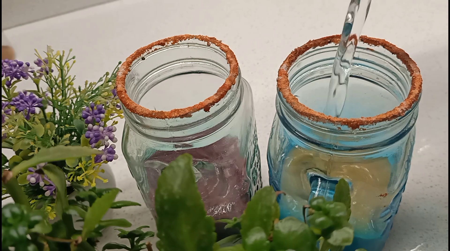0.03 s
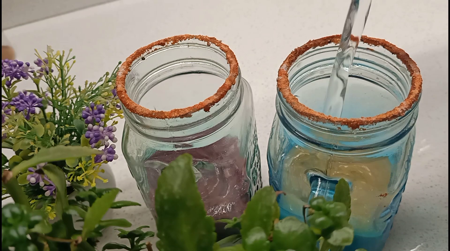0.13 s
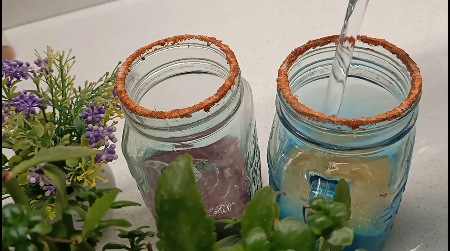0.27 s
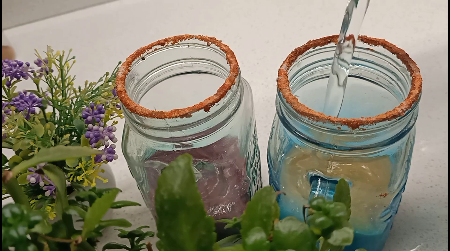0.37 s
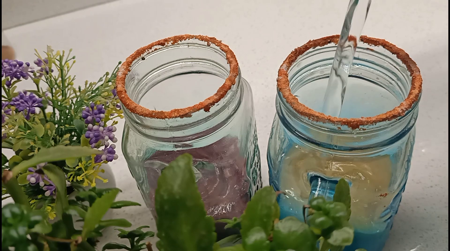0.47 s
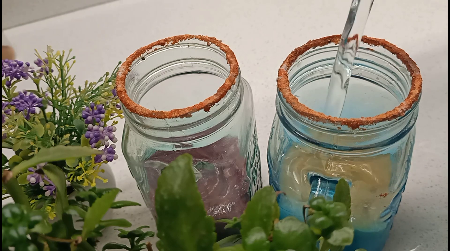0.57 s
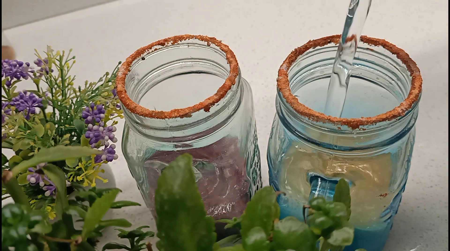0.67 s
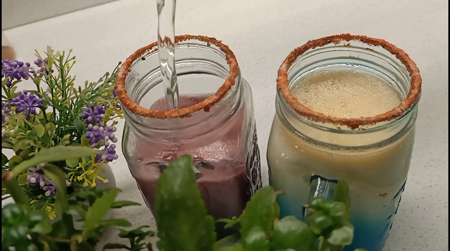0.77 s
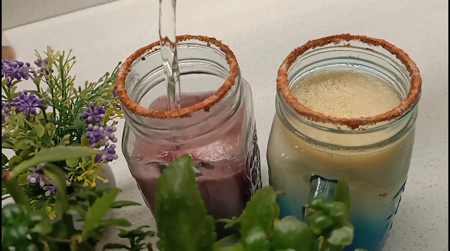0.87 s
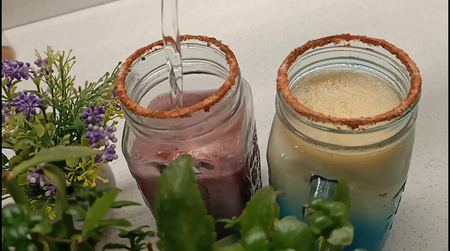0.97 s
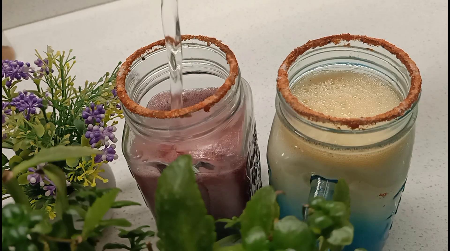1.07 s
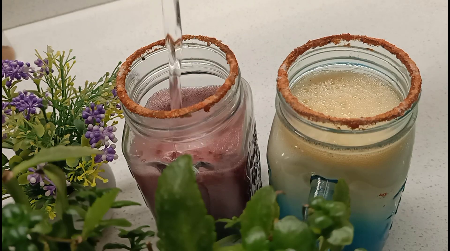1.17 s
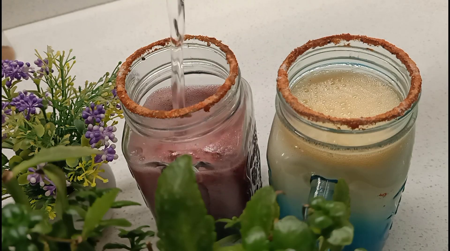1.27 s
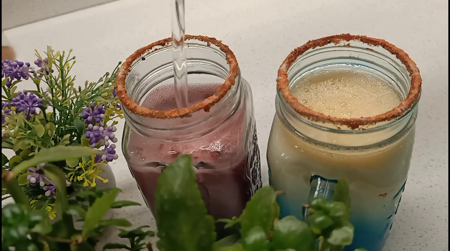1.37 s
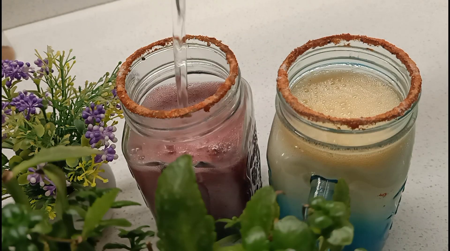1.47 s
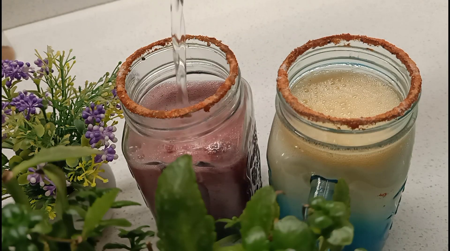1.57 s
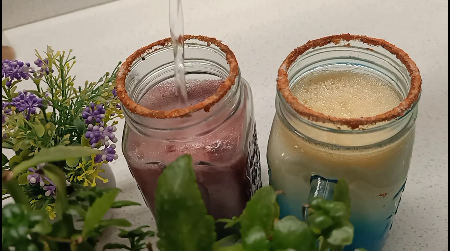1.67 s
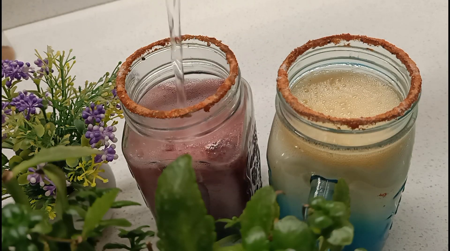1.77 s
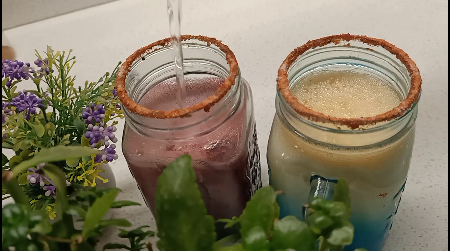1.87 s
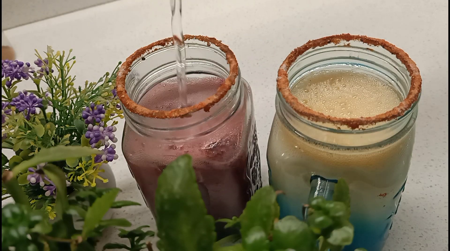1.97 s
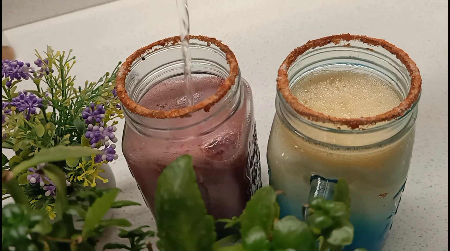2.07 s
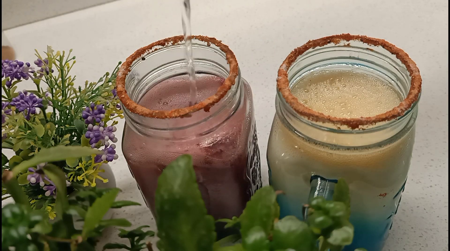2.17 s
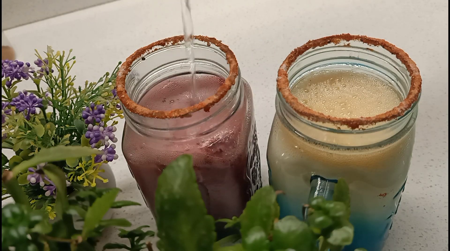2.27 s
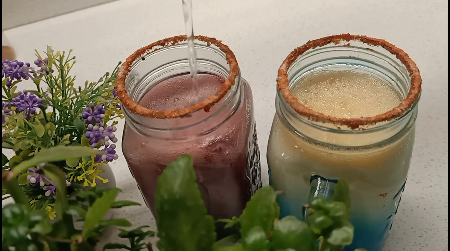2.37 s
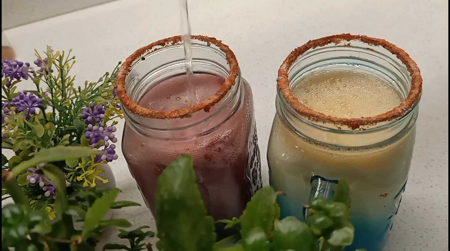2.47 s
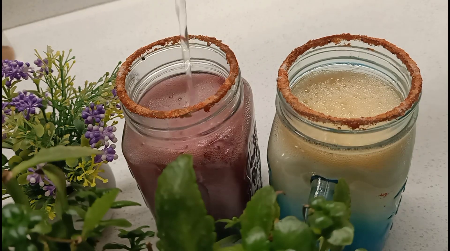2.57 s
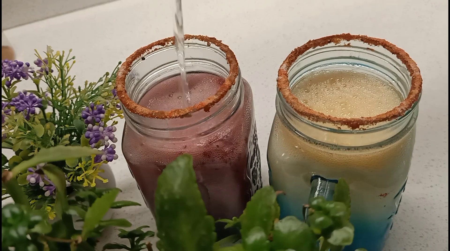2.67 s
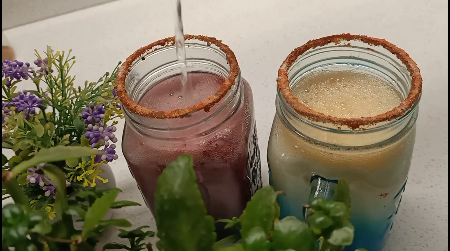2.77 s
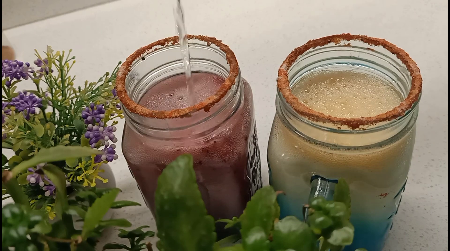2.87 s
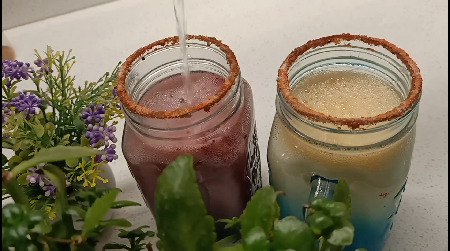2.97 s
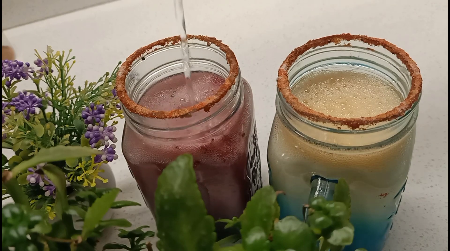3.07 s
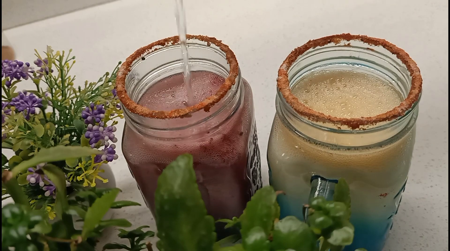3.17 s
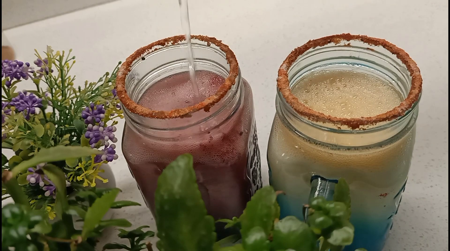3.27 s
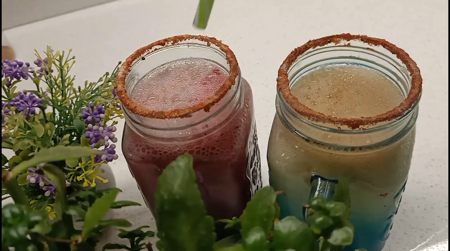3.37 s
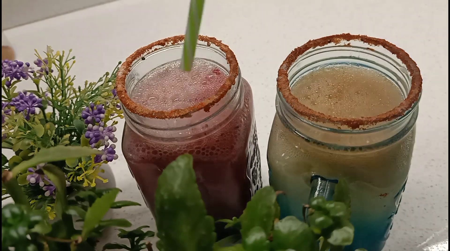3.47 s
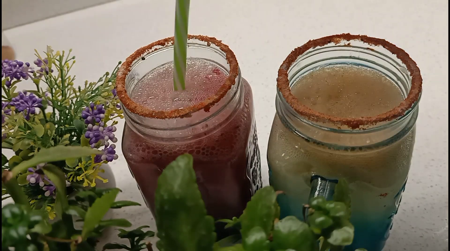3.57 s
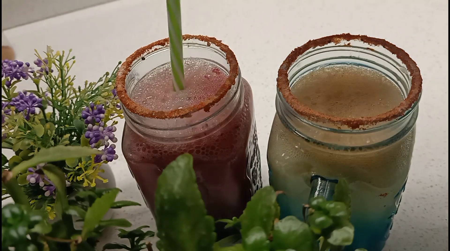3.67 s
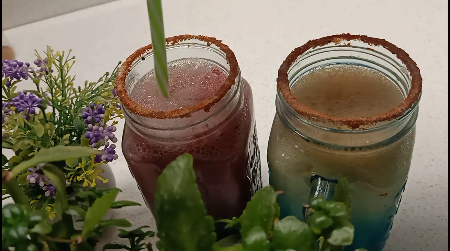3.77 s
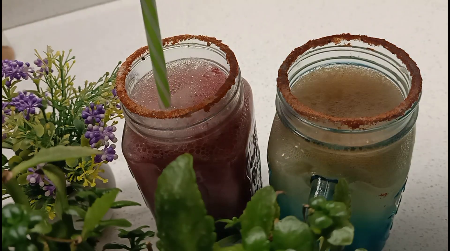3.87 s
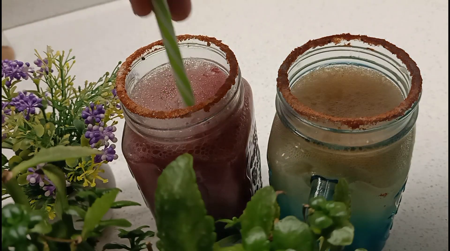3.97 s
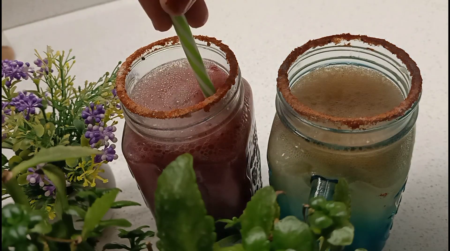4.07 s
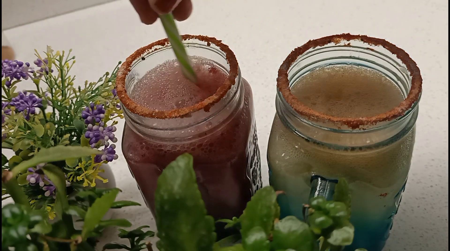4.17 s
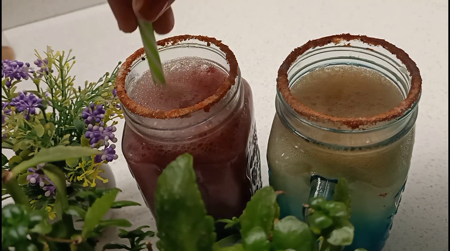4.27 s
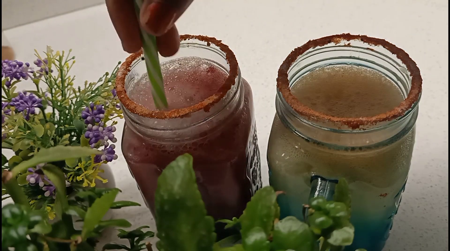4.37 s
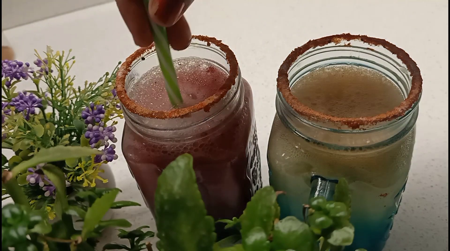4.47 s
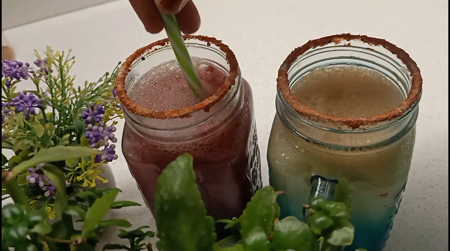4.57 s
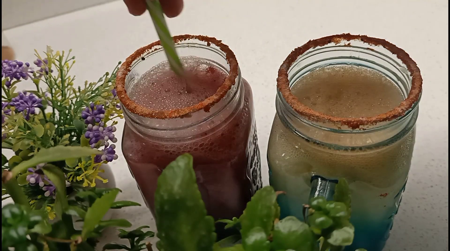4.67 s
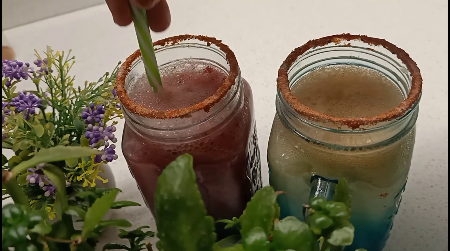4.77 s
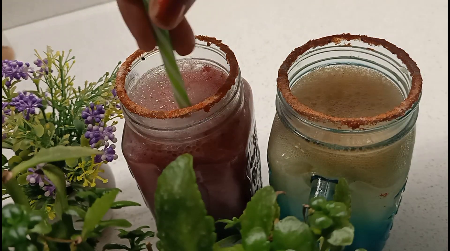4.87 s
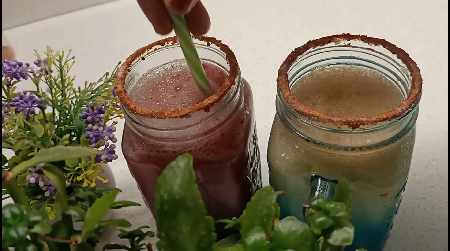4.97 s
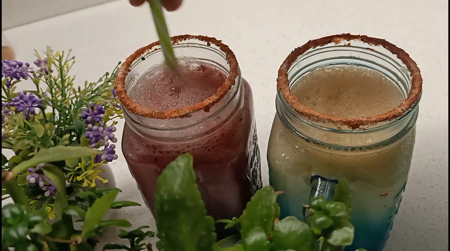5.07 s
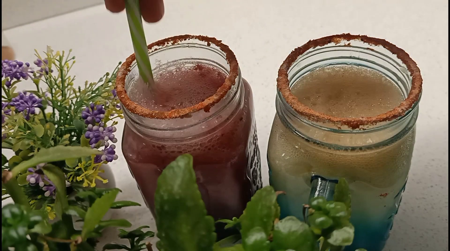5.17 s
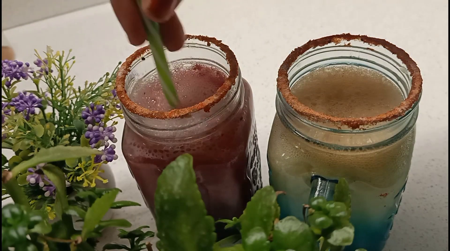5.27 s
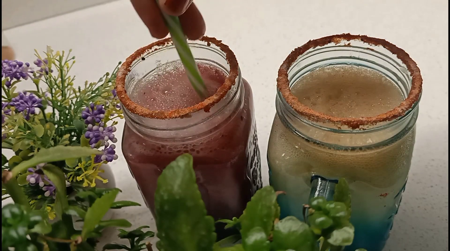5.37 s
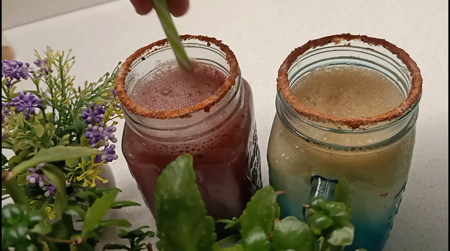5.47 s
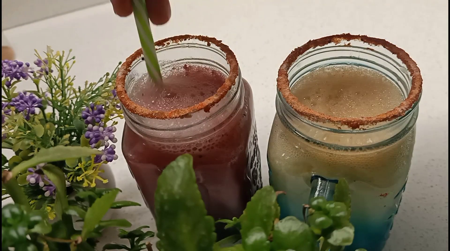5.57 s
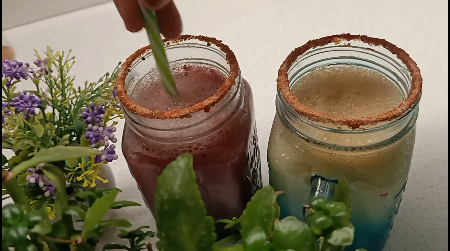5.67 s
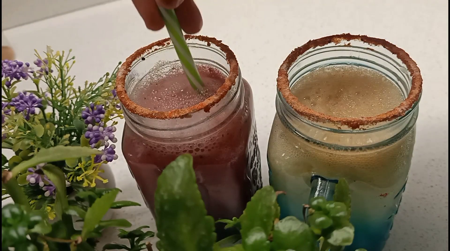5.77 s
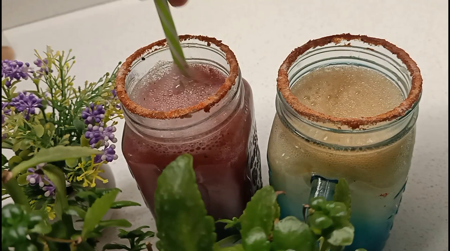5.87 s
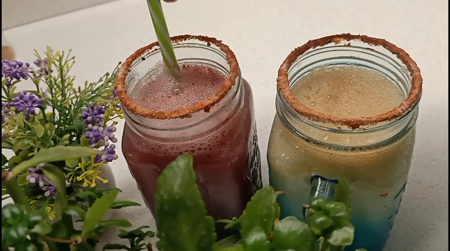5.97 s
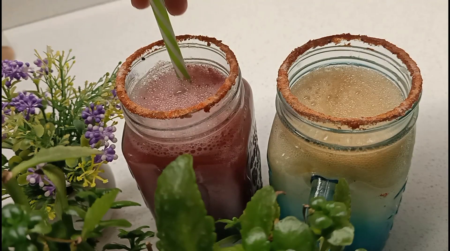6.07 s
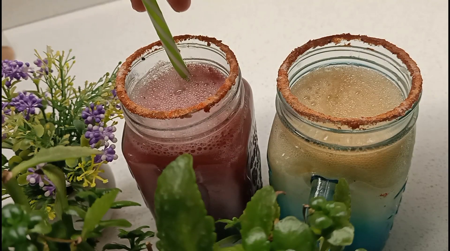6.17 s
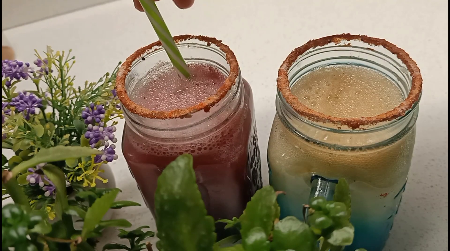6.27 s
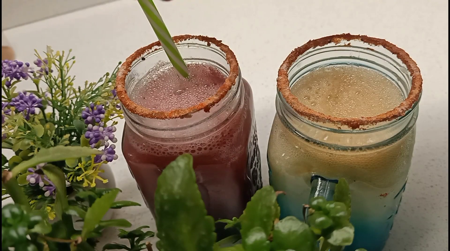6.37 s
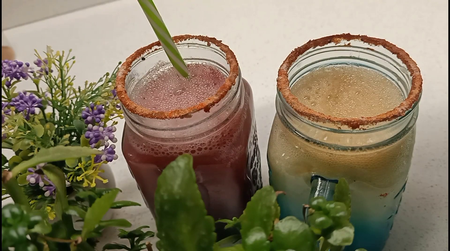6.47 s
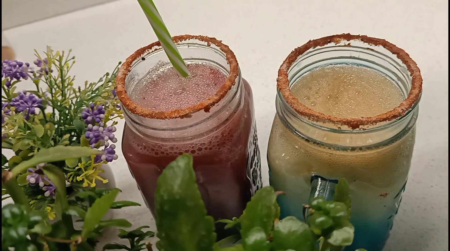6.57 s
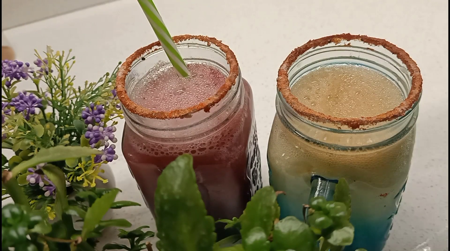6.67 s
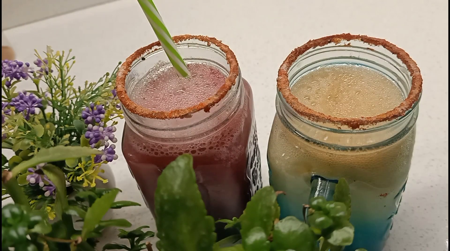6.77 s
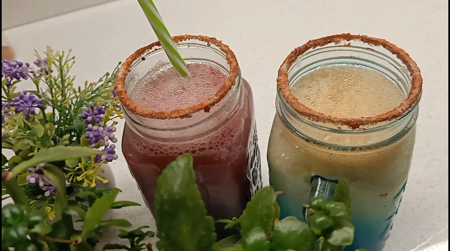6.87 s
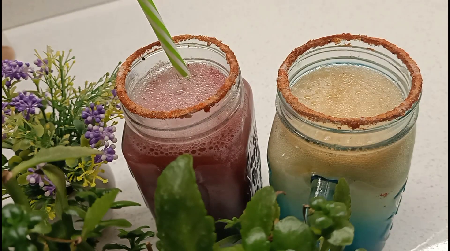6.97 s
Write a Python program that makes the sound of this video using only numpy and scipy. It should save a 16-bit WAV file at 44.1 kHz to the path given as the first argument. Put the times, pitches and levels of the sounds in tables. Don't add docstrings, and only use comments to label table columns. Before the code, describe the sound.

In a small hard-surfaced kitchen, close stereo microphones catch a low steady fridge hum and soft room air. From 0 to 0.9 s soda streams over ice in a glass jar: rapid hollow knocks, glassy clacks and gurgles, with a loud singing swell of the jar's air around 0.6 s. An abrupt cut at 0.9 s brings another jar: deeper wet clunks, strongest from 1.25 to 1.6 s, then round bubble plinks and lighter ice taps over trickling liquid and fine foam hiss, thinning towards 3.4 s. At 3.5 s it cuts to stirring: a tiny metallic bracelet tick, gulps and a thud around 3.6-3.8 s, sparse clicks, then a busier cluster near 4.4 s. Quick clinks, loud plops and jar thuds crowd 5.05-5.8 s. Afterwards a few taps and faint metal ticks fade into fizz and hum until 7 s.

```python
import sys
import numpy as np
from scipy import signal
from scipy.fft import rfft, irfft, next_fast_len
from scipy.io import wavfile
from scipy.ndimage import uniform_filter1d

SR = 44100
rng = np.random.default_rng(int(sys.argv[2]) if len(sys.argv) > 2 else 0)


def to_wav(sig):
    pcm = np.clip(np.atleast_2d(sig), -1, 1) * 32767
    pcm = np.round(pcm).astype(np.int16)
    wavfile.write(sys.argv[1], SR, pcm.T)


def nominal_scale(level):
    x = np.asarray(level, float) / 20
    return 10 ** x


N = 309582

SHOT_BOUNDS = [
    0,
    .884,
    3.465,
    7.03,
]

# (frequency [Hz], density [dB per Hz])
KITCHEN_AIR = [(15, -60), (25, -38), (53, -29), (121, -2), (161, -0.5), (262, -17.5), (415, -22),
               (503, -10), (568, -16.5), (4900, -30.5), (5950, -40.5), (8150, -44.5), (10600, -71),
               (17900, -120)]
# (frequency [Hz], left-right likeness [-1 to 1, clipped])
COHERENCE = [(60, 0.43), (200, 0.071), (680, -2), (2290, 1), (7700, 1)]
# (frequency [Hz], level [dB rms])
FRIDGE_HUM = [(117, -59.5), (215, -76.5), (259, -93), (330, -82), (500, -88.5)]
# (frequency [Hz], t60 [s])
ROOM_DECAY = [(250, 0.39), (1000, 0.31), (2300, 0.3), (3400, 0.36), (8000, 0.17)]
# (delay [s], level [dB])
REFLECTIONS = [
    [(.0011, -22), (.0027, -5), (.0046, -6.5)],
    [(.0006, -13), (.0019, -8.5), (.0038, -36.5)],
]
ROOM_DB = [
    -3,
    -2.5,
    -2.5,
]
# (frequency [Hz], gain [dB])
MIC_RESPONSE = [(25, -2), (80, -8.5), (300, 0), (6800, -4), (7500, -12.5), (7900, -17), (12500, -33),
                (15200, -19), (16200, -70)]
RIGHT_DELAY = [
    1,
    7,
    8,
]
PORT_GAIN_DB = [
    [1.2],
    [-1.2],
]
# (frequency [Hz], gain [dB])
RIGHT_TINT = [(150, -0.5), (300, 3.5), (700, -1.5), (2500, 2), (5000, -1), (9000, 3), (13000, 3.5)]

# (time [s], level [dB])
STREAM_LEVEL = [(0.0, -47), (0.306, -56), (0.672, -48), (0.884, -44.5), (0.886, -56), (1.13, -81),
                (1.42, -54), (1.69, -59.5), (2.23, -51), (3.31, -56), (3.43, -53), (3.465, -61)]
# (time [s], level [dB])
STRAW_PULLS = [
    (3.75, -56),
    (4.399, -52),
    (5.23, -53),
    (5.372, -49.5),
    (5.79, -56),
]
SLOSH_LEVEL = [
    -63,
    -50,
    -51,
]
FOAM_LEVEL = [
    -59.5,
    -58.5,
    -62,
]
# (time [s], level [dB], fall [dB/s])
BARE_ICE = [
    (0.304, -41, 203),
    (2.26, -57.5, 77),
]
# (frequency [Hz], density [dB per Hz])
FIZZ_SPECTRUM = [(3000, -20), (4500, -14.5), (6500, -4), (8000, -7), (11000, -3), (13000, -2),
                 (15200, -0.5), (16000, -28.5)]
# (frequency [Hz], density [dB per Hz])
GURGLE_SPECTRUM = [(150, -50), (300, -9), (600, 4), (1000, 0.5), (1400, -1), (1900, 2), (3000, -5.5),
                   (4200, -15.5), (6000, -60), (8000, -44.5)]
# (time [s], peak level [dB], frequency [Hz])
LONE_PLOPS = [(0.2103, -53, 2700), (0.244, -41, 2700), (0.266, -29.5, 1770), (0.2903, -27, 3870),
              (0.5022, -34, 1390), (0.672, -24.5, 1360), (1.866, -51, 1000), (2.013, -38, 1280),
              (2.024, -34, 1330), (2.145, -39, 1400), (2.322, -34, 1390), (2.478, -38, 1380),
              (2.652, -31, 1430), (2.728, -55, 1390), (2.767, -42, 1430), (2.786, -40, 1540),
              (2.802, -48, 1380), (2.826, -38, 1470), (2.862, -32.5, 1440), (2.939, -46, 1380),
              (2.985, -36.5, 1450), (3.07, -47, 1340), (3.104, -39, 1410), (3.256, -39, 1440),
              (3.288, -38, 1430), (3.314, -31, 1510), (3.373, -36.5, 1390), (3.76, -29.5, 810),
              (4.2915, -40, 2260), (4.868, -45, 1370), (5.219, -28, 1300)]
# (time [s], peak level [dB], frequency [Hz])
LONE_PLINKS = [(1.299, -33, 1270), (1.3973, -26.5, 1250), (1.4336, -22, 1220), (1.482, -25, 1290),
               (1.5465, -35, 1290), (1.5803, -29, 1240), (1.6128, -37, 1300), (1.6387, -33, 1280),
               (1.7719, -36, 1300), (1.987, -38, 1300), (2.0827, -30, 1370), (2.1105, -23.5, 1340),
               (2.192, -34, 1340), (2.2724, -34, 1400), (2.3208, -37, 1340), (2.3787, -35, 1390),
               (2.4517, -29, 1410), (2.51, -28, 1370), (2.5213, -37, 1310), (2.5426, -35, 1350),
               (2.6711, -30, 1450), (2.895, -36, 1380), (3.3053, -38, 1480), (4.62, -37, 1300),
               (4.7416, -57, 1390), (5.1414, -41, 1420), (5.1654, -37, 1270), (5.188, -34, 1270),
               (5.2195, -15, 1420), (5.252, -46, 1450), (5.3698, -22, 1140), (5.5282, -26.5, 1430),
               (5.5839, -31, 1260), (5.7418, -43, 1260), (5.7578, -38, 1340), (5.7745, -36, 1140),
               (5.797, -33, 1220), (5.8178, -32, 1340), (5.8469, -43, 1250), (6.0346, -48, 1390)]

# (time [s], peak level [dB])
LINK_TOUCHES = [
    (3.5473, -43),
    (6.1953, -55.5),
    (6.463, -56),
    (6.8917, -49),
    (6.994, -49.5),
]
# (frequency [Hz], level [dB], t60 [s])
LINK_MODES = [(4940, -7.5, 0.08), (6425, 0, 0.1), (7800, 0, .04), (10500, 1.5, 0.048), (10500, 4.5, 0.0403),
              (11200, 5.5, .04), (14750, 1, 0.03), (15050, 7, 0.097), (15300, 0.5, 0.019), (15550, 8, .02)]
# (time [s], peak level [dB], frequency [Hz], cycles to the peak [1])
JAR_THUDS = [(0.01, -50, 106.6, 0.64), (0.68, -51, 60, 2.4), (1.052, -43.5, 164.7, 1.4),
             (1.66, -43.5, 114, 2.3), (1.799, -43, 118, 2.9), (2.14, -54, 300, 1.5), (2.341, -41, 99, 2.1),
             (3.19, -33, 133, 0.68), (3.627, -39, 194, 1.15), (3.759, -35, 243, 0.54),
             (5.362, -29, 241, 0.56), (5.373, -31.5, 312, 1.3), (5.72, -38.5, 223, 1.4),
             (5.761, -32, 215, 0.9), (5.787, -27.5, 290, 0.62), (5.81, -46, 197, 1.3)]
# (time [s], peak level [dB], frequency [Hz], cycles to the peak [1])
AIR_SWELLS = [
    (0.0, -28, 658, 17),
    (0.083, -35.5, 694, 5),
    (0.165, -35, 691, 8.2),
    (0.522, -30, 690, 3.5),
    (0.575, -5.5, 730, 2.15),
    (0.638, -11, 702, 5.3),
    (0.683, -17.5, 737, 8.9),
    (0.706, -31.5, 2720, 48),
    (0.812, -23.5, 761, 4.8),
    (0.828, -17, 770, 8.7),
]
# (time [s], blip peak level [dB], blip frequency [Hz], hardness [dB])
GULPS = [(1.0583, -25.5, 498, -36), (3.614, -26, 1030, -16), (3.628, -29.5, 900, -13),
         (3.643, -33, 1000, -20), (3.67, -36.5, 870, -19), (3.718, -46, 590, -15), (5.309, -60.5, 746, 26),
         (5.3602, -16, 687, -34), (5.371, -39, 784, -31), (5.743, -39.5, 955, 13),
         (5.7655, -16.5, 678, -26), (5.783, -23, 689, -14), (5.948, -24.5, 996, -8.5),
         (6.4, -43.5, 773, -35.5), (6.412, -43.5, 764, -33), (6.427, -46.5, 970, -39),
         (6.445, -61, 780, -30), (6.462, -64, 780, -30)]
# (frequency [Hz], width [Hz], level [dB])
ICE_POCKETS = [
    (700, 76, -9),
    (1000, 41, -9),
]

# (starting frequency [Hz], rise as the jar fills [Hz/s], width [Hz], level [dB])
JAR_MODES = [
    [(624, 107, 26, -8), (709.4, 40, 5, 1.5), (293.6, -45, 21, 24.5), (2720, 11.5, 88, 7.5),
     (3050, 13.5, 12, -7.5)],
    [(406.6, 0.02, 44.5, 14.5), (1000, 0.052, 194, 4.5), (1390, 0.02, 89, 8)],
    [(290, 0.016, 24.3, 17), (746, 0.016, 110, -3), (1398, 0.011, 45, 7.5), (3300, 0.0073, 190, -0.5)],
]
# (time [s], blip peak level [dB],
# hardness: clack over blip [dB], sharpness: tick over blip [dB])
FIRST_JAR_KNOCKS = [(0.001, -18, -13, -8.5), (0.0691, -30.5, -31.5, -27), (0.0831, -26, -20, -4),
                    (0.1204, -25.5, -14, -4.5), (0.1707, -37, -24, -25), (0.19, -46.5, -7, 19.5),
                    (0.2594, -51, 19.5, 7), (0.2805, -31.5, -5.5, -31), (0.2983, -31.5, 4, 0.5),
                    (0.308, -20.5, -1.5, -10), (0.3633, -13.5, -24.5, -35.5), (0.4134, -17.5, -7.5, -13),
                    (0.4505, -29, -9.5, -3.5), (0.5166, -26.5, 1.5, 1), (0.5324, -29, -13.5, -26),
                    (0.5706, -5.5, -35.5, -4.5), (0.6299, -35, 5, -19), (0.6385, -11, -13, -4),
                    (0.6855, -22, -2, -20), (0.7032, -28, 4.5, 5.5), (0.7493, -17, -17.5, -12),
                    (0.8142, -17.5, -24.5, -72), (0.8252, -20.5, -7.5, -5), (0.8369, -23.5, -28, -12),
                    (0.8703, -35.5, 4, 9)]
DEEP_KNOCKS = [(0.9065, -35.5, -3.5, -18), (1.0189, -25, -32, -31), (1.0575, -17.5, -25.5, -24),
               (1.2033, -17, -10.5, -34), (1.2075, -36.5, 8, -18), (1.261, -25, -6, -15),
               (1.2722, -12, -5.5, 1.5), (1.298, -23.5, -22, -5), (1.3517, -9.5, -20, -28),
               (1.3955, -13.5, -24, -44), (1.4163, -9, -13.5, -14), (1.4548, -8, -21, -26),
               (1.478, -21, 4.5, 3), (1.435, -25, -34, -34), (1.6389, -23, -16, -40),
               (1.7917, -25.5, -3, -26), (1.8825, -29, -21, -17), (2.191, -38, -18, 6),
               (2.4095, -40.5, 14.5, 1), (2.5072, -25, -26, -10), (2.5729, -26, -11.5, -14),
               (2.5967, -28.5, -15, -29), (2.6437, -27.5, -19, -29), (3.1944, -27, -63, -27),
               (3.4522, -35.5, -12, -22)]
SURFACE_KNOCKS = [(1.5002, -16.5, -41, -16), (1.5738, -17.5, -21, -30), (1.5882, -13.5, -25, -17),
                  (1.7285, -23, 2.5, -2.5), (1.7781, -25, -4, -8), (1.8985, -14.5, -10, -44),
                  (1.9544, -26.5, 3, 3), (2.0341, -27, -21, -29), (2.0464, -21, -8.5, -6),
                  (2.0954, -26, -33, -1), (2.1104, -23, -12, -40), (2.1268, -18.5, -20, -30),
                  (2.172, -25, -17, -14), (2.2693, -36, -0.5, -13), (2.3009, -20.5, -48, -27),
                  (2.3427, -20, -17.5, -22), (2.3878, -18.5, -14.5, -18), (2.4241, -19.5, -30, -15),
                  (2.4321, -38.5, 19.5, 17), (2.5499, -23, -9, -10), (2.6672, -22.5, -12.5, -18),
                  (2.8516, -33, -23, -29), (2.9112, -25.5, -20, -37), (3.0278, -28.5, -14, -33),
                  (3.1231, -23.5, -20.5, -34), (3.1672, -35, -26, -30), (3.2217, -25, -15, -11),
                  (3.3033, -36.5, 5, -31), (3.3862, -30, -1.5, -29), (3.4076, -25, -3.5, -1)]
STIR_KNOCKS = [(3.7575, -16, -19, -14), (3.8732, -45.5, 20.5, 28.5), (3.9223, -36, 8, 2),
               (4.027, -38.5, -17, -18), (4.0478, -34, -20, -5), (4.0584, -29, -19, -15),
               (4.1186, -29.5, -9.5, -9), (4.1951, -27.5, -10.5, -6), (4.2222, -27, -12, -10),
               (4.2687, -17, -10, 0.5), (4.3096, -25, -8.5, -21), (4.3509, -25.5, -12, -6),
               (4.3746, -27, -20, -9), (4.4397, -25.5, -3, 6.5), (4.4487, -18.5, -9, -32),
               (4.4585, -30.5, 9.5, 14), (4.4661, -46, -17, 11), (4.4875, -18, -1, -2.5),
               (4.5135, -18, -11, -4), (4.6185, -27.5, -7.5, -27.5), (4.6659, -31, -16, -38),
               (4.7405, -27.5, -3.5, -12), (4.9024, -19, -17, -8), (4.9088, -33, 6, -6),
               (4.9239, -28, -5, -2),
               (5.0278, -29, -37, -30), (5.0624, -10.5, -13, -6.5), (5.106, -25.5, -8.5, -7),
                     (5.142, -52, 4, -22), (5.1651, -20, 1, -1.5), (5.215, -14.5, 0.5, 7),
                     (5.3349, -21, -6.5, 1), (5.39, -20, -5, -15), (5.3969, -22.5, -11, 0),
                     (5.4263, -22, -3.5, 1.5), (5.455, -33.5, 4.5, -15), (5.4763, -28.5, -13.5, -24),
                     (5.4783, -21, 0.5, 0), (5.5283, -25, -3.5, -6), (5.581, -21.5, -32, -20),
                     (5.6648, -30, -4.5, -25), (5.7165, -27.5, -29, -19), (5.7284, -25, -6, 4),
                     (5.7397, -20.5, 4.5, 1), (5.8065, -13, -7.5, -31), (5.8672, -26, -6, 0.5),
                     (6.03, -24.5, -3, -4.5), (6.055, -31.5, -3, -11), (6.07, -42, 10, 14.5),
                     (6.255, -65, 11, -1), (6.3241, -32, -47, -35)]
# (time [s], centre of the clack [Hz])
WALL_SPOTS = [(0.1204, 2780), (0.2594, 2840), (0.2983, 3530), (0.308, 3050), (0.4134, 2550), (0.4505, 2330),
              (0.5166, 3180), (0.6299, 3070), (0.6385, 2920), (0.6855, 3060), (0.7032, 3350),
              (0.8252, 2800), (0.8703, 2740), (1.2033, 2330), (1.261, 2650), (1.2722, 2730), (1.4163, 2600),
              (1.4771, 3370), (1.7285, 3380), (1.7917, 2940), (1.8985, 2800), (1.9544, 3460),
              (2.0464, 3140), (2.4095, 3020), (2.4321, 3540), (2.5499, 2660), (3.3033, 2800),
              (3.3862, 3100), (3.4076, 2480), (3.8732, 3320), (3.9223, 2580), (4.1186, 3100),
              (4.1951, 2500), (4.2687, 2640), (4.3096, 2820), (4.4397, 2620), (4.4569, 3270),
              (4.4866, 3300), (4.5135, 2500), (4.6185, 2640), (4.7378, 2600), (4.9088, 2940),
              (5.0624, 2630), (5.1654, 3180), (5.215, 3200), (5.3347, 2430), (5.3905, 3080), (5.4261, 2340),
              (5.455, 3480), (5.4783, 2600), (5.6644, 2940), (5.7393, 3050), (5.8067, 2940), (6.0297, 2500)]

# (frequency at its first knock [Hz], rise [Hz/s])
FIRST_AIR, DEEP_AIR, SURFACE_AIR, STIRRED_AIR = (672, 95), (1010, -20), (1250, 100), (1340, 10)
LIFT_DB, CLACK_DB, SNAP_DB, TICK_DB, SLAP_DB = 4, -8, -10, -15, -11.5


def evened(x):
    return x / np.sqrt(np.mean(x ** 2) + 1e-20)


def read(points, hz):
    f, value = np.transpose(points)
    return np.interp(np.log(hz + 1), np.log(f + 1), value)


def add(mix, s, sound):
    part = mix[round(s * SR):][:len(sound)]
    part += sound[:len(part)]


def coloured(x, points):
    size = next_fast_len(N)
    gain = nominal_scale(read(points, np.fft.rfftfreq(size, 1 / SR)))
    return irfft(rfft(x, size) * gain, size)[..., :N]


def resonate(x, hz, width):
    turn = np.exp(2j * np.pi * np.cumsum(hz * np.ones(len(x))) / SR)
    r = np.exp(-np.pi * width / SR)
    return 2 * (turn * signal.lfilter([1 - r], [1, -r], x / turn)).real


def kitchen():
    frames, hz = N // 256 + 5, np.fft.rfftfreq(1024, 1 / SR)
    a, b, c, d, patches = rng.standard_normal((frames, 513, 5)).T
    patches = evened(uniform_filter1d(uniform_filter1d(patches, 10, 0), 12, 1))
    same = np.clip(read(COHERENCE, hz), -1, 1)[:, None]
    left = a + 1j * b
    right = same * left + np.sqrt(1 - same ** 2) * (c + 1j * d)
    before_mic = (read(KITCHEN_AIR, hz) - read(MIC_RESPONSE, hz))[:, None]
    z = np.array([left, right]) * nominal_scale(before_mic + patches)
    air = evened(signal.istft(z, nperseg=1024, noverlap=768)[1][:, :N])
    hum = sum(nominal_scale(db) * evened(resonate(rng.standard_normal(N), f, 10)) for f, db in FRIDGE_HUM)
    return nominal_scale(-61) * air + hum


def room():
    taps = np.zeros((2, SR // 2))
    slots = np.arange(180, SR // 2 - 20, 20)
    at = slots + rng.integers(0, 20, (2, len(slots)))
    np.put_along_axis(taps, at, rng.choice([-1., 1.], at.shape), 1)
    hz, t, z = signal.stft(taps, SR, nperseg=256)
    mono = 0.26 / (1 + (hz[:, None] / 1000) ** 4)
    z = (1 - mono) * z + mono * z[:1]
    decay = nominal_scale(-60 * t / read(ROOM_DECAY, hz)[:, None])
    tail = signal.istft(z * decay, SR, nperseg=256)[1]
    return tail / np.linalg.norm(tail, axis=1, keepdims=True)


def echoes(ports, t):
    turns = [np.cos(2 * np.pi * (1.7 * t + k / 3)) * np.sqrt(2 / 3) for k in range(3)]
    return sum(signal.oaconvolve(turn * ports, room(), axes=1)[:, :len(t)] for turn in turns)


def bounced(dry, lag):
    high = signal.sosfilt(signal.butter(N=2, Wn=1300, btype="high", fs=SR, output="sos"), dry)
    near = [sum(nominal_scale(db) * np.roll(high, round(s * SR)) for s, db in port) for port in REFLECTIONS]
    return nominal_scale(np.array(PORT_GAIN_DB)) * (np.array([dry, np.roll(dry, lag)]) + near)


def flow(shot_db, follows):
    t = np.arange(N) / SR
    pulls = [db - np.maximum(48 * (s - t), 42 * (t - s)) for s, db in STRAW_PULLS]
    stirred = np.maximum(np.max(pulls, 0), -73.5)
    poured = np.interp(t, *np.transpose(STREAM_LEVEL))
    motion = np.where(t < SHOT_BOUNDS[2], poured, stirred)
    shot = np.searchsorted(SHOT_BOUNDS, t, "right") - 1
    return nominal_scale(np.array(shot_db)[shot] + follows * (motion + 50))


def slosh():
    lumps = nominal_scale(3 * evened(uniform_filter1d(rng.standard_normal(N), 1500)))
    low = signal.butter(N=3, Wn=[90, 210], btype="band", fs=SR, output="sos")
    return flow(SLOSH_LEVEL, 1) * evened(lumps * signal.sosfilt(low, rng.standard_normal(N)))


def grains(low_hz, top_hz, cycles, per_s, spread_db, count=24):
    out = np.zeros(N)
    for hz in np.geomspace(low_hz, top_hz, count):
        u = np.arange(int(3 * SR * cycles / hz)) * hz / SR / cycles
        bubble = np.sin(2 * np.pi * cycles * u * (1 + 0.1 * u)) * u * np.exp(-2.5 * u)
        strength = nominal_scale(spread_db * np.minimum(rng.exponential(1, N), 4))
        train = (rng.random(N) < per_s / count / SR) * strength
        out += signal.oaconvolve(train, bubble * np.sqrt(hz))[:N]
    return out


def fizz():
    t = np.arange(N) / SR
    pops = np.array([grains(4700, 12000, 8.3, 6000, 2.5, count=10) for port in range(2)])
    spray = sum(nominal_scale(db - fall * abs(t - s)) for s, db, fall in BARE_ICE)
    return nominal_scale(7) * (flow(FOAM_LEVEL, 0.11) + spray) * evened(coloured(pops, FIZZ_SPECTRUM))


def ring(hz, t60, t, rise=0.0022):
    return np.sin(2 * np.pi * hz * t) * nominal_scale(-60 * t / t60) * (1 - np.exp(-t / rise))


def bracelet():
    out, t = np.zeros(N), np.arange(SR // 3) / SR
    link = sum(nominal_scale(level) * ring(hz, t60, t) for hz, level, t60 in LINK_MODES)
    for s, db in LINK_TOUCHES:
        add(out, s, nominal_scale(db) * link)
    return out


def tones(rows):
    out, t = np.zeros(N), np.arange(SR // 6) / SR
    for s, db, hz, cycles in rows:
        u = t * hz / cycles
        add(out, s, nominal_scale(db) * np.sin(2 * np.pi * hz * t) * u * np.exp(.5 - u ** 2 / 2))
    return out


def gurgle():
    tilt = [(hz, db + 3 * np.log2(hz / 1000)) for hz, db in GURGLE_SPECTRUM]
    return nominal_scale(3.5) * flow([-50] * 3, 1) * evened(coloured(grains(250, 5300, 2.2, 1500, 5.2), tilt))


def lone_bubbles():
    plops = [(*row, 1.9) for row in LONE_PLOPS]
    plinks = [(*row, 1.4) for row in LONE_PLINKS]
    return tones(plops + plinks)


def burst(low_hz, top_hz, t60, t):
    band = signal.butter(N=2, Wn=[low_hz, top_hz], btype="band", fs=SR, output="sos")
    grit = 0.11 * rng.standard_normal(len(t)) * nominal_scale(-60 * t / t60)
    sound = signal.sosfilt(band, (t == 0) + grit)
    return sound / abs(sound).max()


def blip(hz, cycles, t):
    u = t * hz / cycles
    return np.sin(2 * np.pi * hz * t) * np.e * u * np.exp(-u)


def clack_band(s, usual_hz):
    found = [hz for at, hz in WALL_SPOTS if abs(at - s) < .0045]
    return (found[0] / 1.29, found[0] * 1.29) if found else usual_hz


def pitched(rows, air):
    hz, rise = air
    first = rows[0][0]
    return [(s, db, (hz + rise * (s - first)) * (1 + .03 * rng.uniform(-0.74, 1)), hard, sharp)
            for s, db, hard, sharp in rows]


def knocks(rows, cycles, below, clack_t60, clack_hz, top_share):
    out, t = np.zeros(N), np.arange(1500) / SR
    for s, db, blip_hz, hard, sharp in rows:
        lower, upper = rng.uniform([.6, 1.2], [.8, 1.55])
        wet = blip(blip_hz, cycles, t)
        wet += below * blip(lower * blip_hz, 1.7 * cycles, t)
        wet -= 0.74 * blip(upper * blip_hz, 0.6 * cycles, t)
        slap = nominal_scale(SLAP_DB) * burst(850, 1810, 0.028, t)
        clack = 4 * nominal_scale(hard + CLACK_DB) * burst(*clack_band(s, clack_hz), clack_t60, t)
        snap = 3 * nominal_scale((hard + sharp) / 2 + SNAP_DB) * burst(2186, 15000, 0.2 * clack_t60, t)
        top = burst(6700, 14000, 0.0086, t) + 0.66 * burst(12500, 15800, 0.009, t)
        tick = nominal_scale(sharp + TICK_DB) * (3 * burst(5060, 8140, 0.017, t) + top_share * top)
        add(out, s, nominal_scale(db + LIFT_DB) * (0.32 * wet + slap + clack + snap + tick))
    return out


def gulped_air():
    rows = [(s, db + 2.5, hz, hard, hard + 2) for s, db, hz, hard in GULPS]
    gulps = knocks(rows, 1.45, 0.23, 0.016, (2000, 3600), 0.4)
    return gulps + sum(nominal_scale(db) * resonate(gulps, hz, width) for hz, width, db in ICE_POCKETS)


def ice():
    second = pitched(DEEP_KNOCKS, DEEP_AIR) + pitched(SURFACE_KNOCKS, SURFACE_AIR)
    stirred = pitched(STIR_KNOCKS, STIRRED_AIR)
    return [knocks(pitched(FIRST_JAR_KNOCKS, FIRST_AIR), 1.64, 0.065, 0.0094, (1900, 4300), 0.55),
            knocks(second, 1.11, 0.28, 0.0081, (2300, 4200), 1.0),
            knocks(stirred, 1.38, 0.3, 0.015, (2300, 4400), 0.38)]


def scene():
    out = kitchen() + fizz() + slosh()
    liquid = gurgle() + lone_bubbles()
    direct = bracelet() + tones(AIR_SWELLS + JAR_THUDS) + gulped_air()
    direct += nominal_scale(-35) * ring(3090, 0.15, np.arange(N) / SR)
    drift = uniform_filter1d(uniform_filter1d(rng.standard_normal(N), 2500), 2500)
    shift = 1 + .025 * evened(drift)
    shots = zip(ice(), JAR_MODES, RIGHT_DELAY, ROOM_DB, SHOT_BOUNDS, SHOT_BOUNDS[1:])
    for hit, jar, lag, room_db, start, end in shots:
        shot = slice(round(start * SR), round(end * SR))
        drive = (hit + liquid)[shot]
        t = np.arange(len(drive)) / SR
        wander = shift[shot] if start else 1
        rung = sum(nominal_scale(db) * resonate(drive, (hz + rise * t) * wander, width)
                   for hz, rise, width, db in jar)
        near = drive + direct[shot] + rung
        spill = drive + direct[shot] + 0.41 * rung
        far = spill - 0.5 * resonate(spill, 4500, 1500)
        out[:, shot] += bounced(near, lag) + nominal_scale(room_db) * echoes(np.array([far, far]), t)
    return np.array([out[0], coloured(out[1], RIGHT_TINT)])


def low_pass(x):
    return signal.sosfilt(signal.butter(12, 16000, fs=SR, output="sos"), x)


def record(dry):
    heard = coloured(dry, MIC_RESPONSE)
    mix = 1.3 * np.tanh(heard / 1.3)
    return low_pass(mix)


dry = scene()
out = record(dry)
to_wav(out)
```